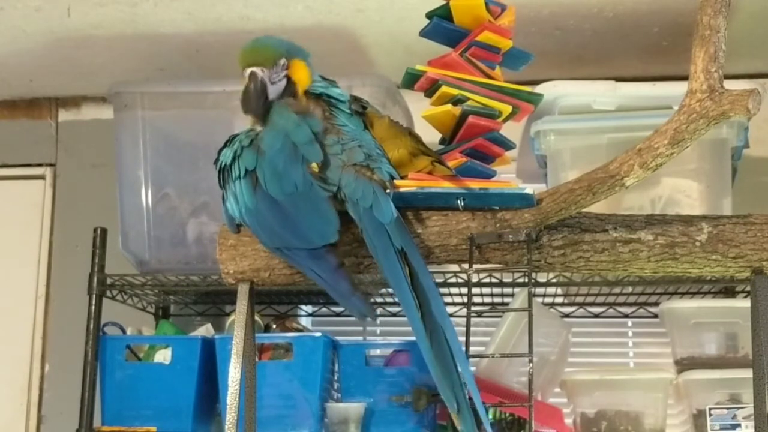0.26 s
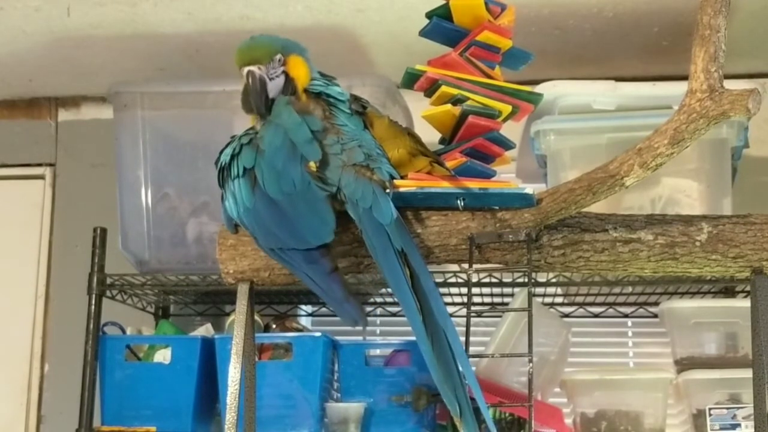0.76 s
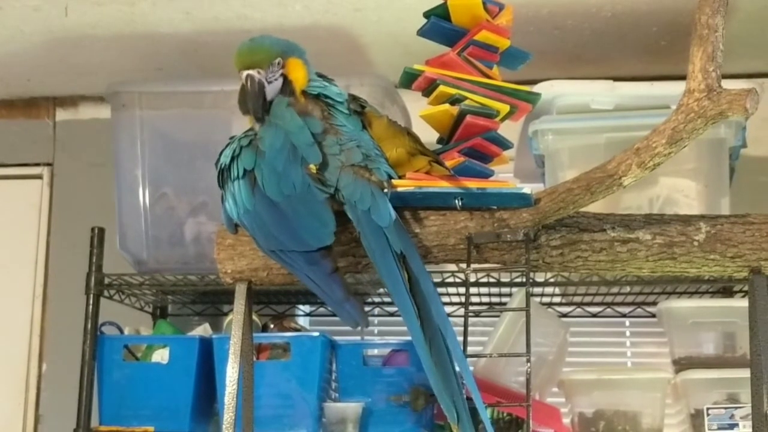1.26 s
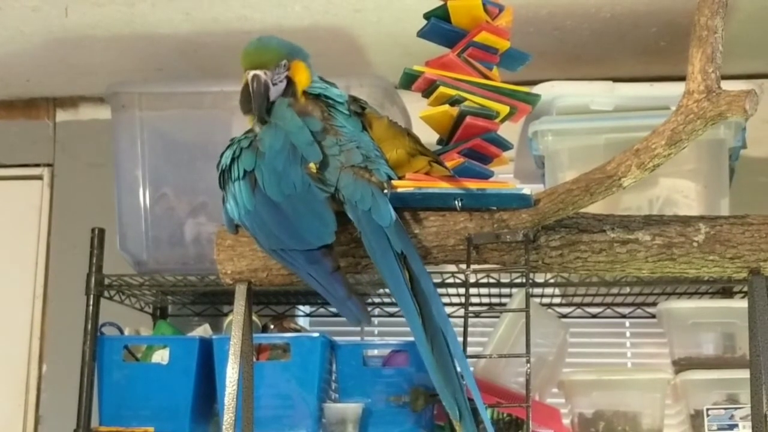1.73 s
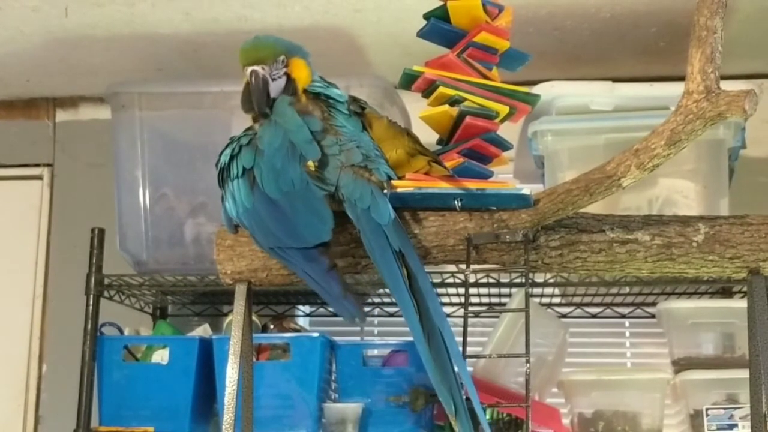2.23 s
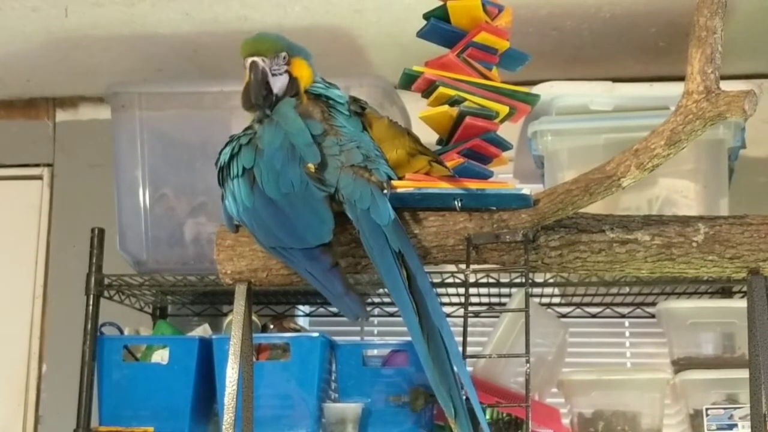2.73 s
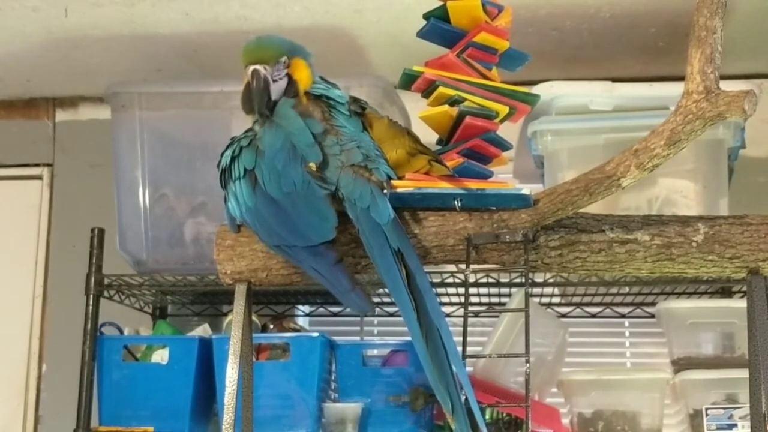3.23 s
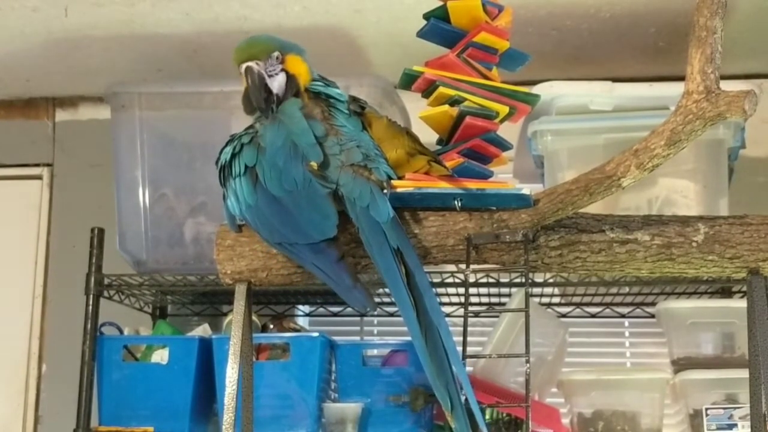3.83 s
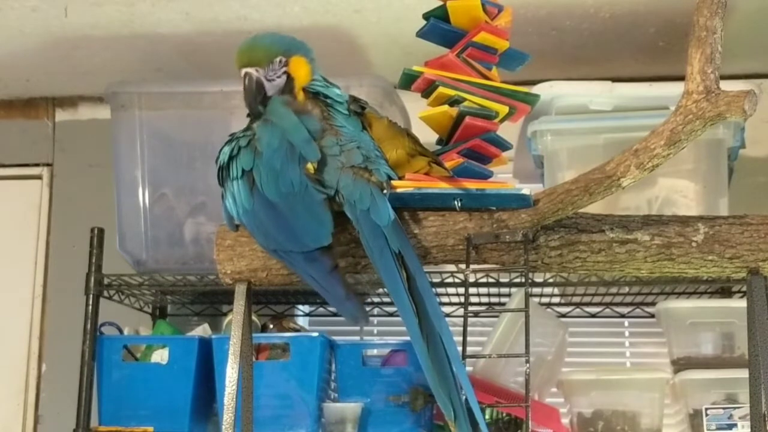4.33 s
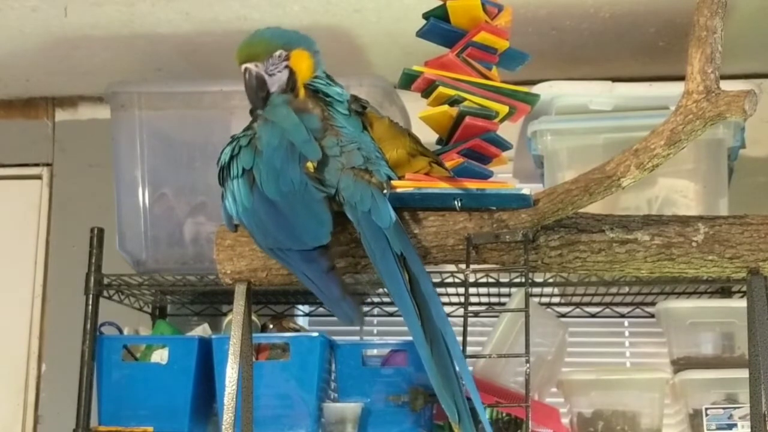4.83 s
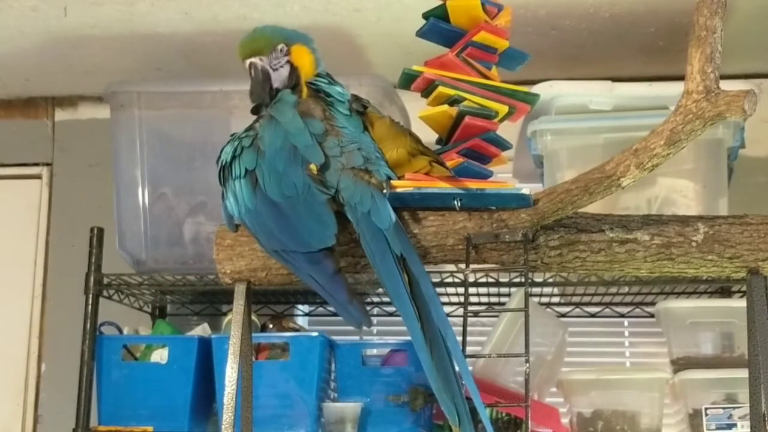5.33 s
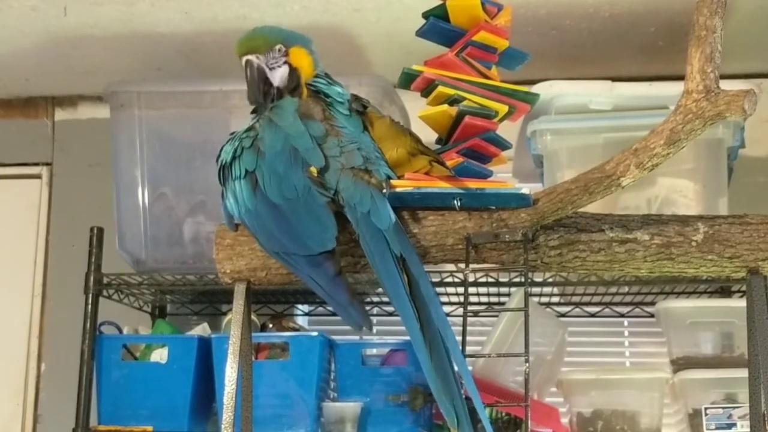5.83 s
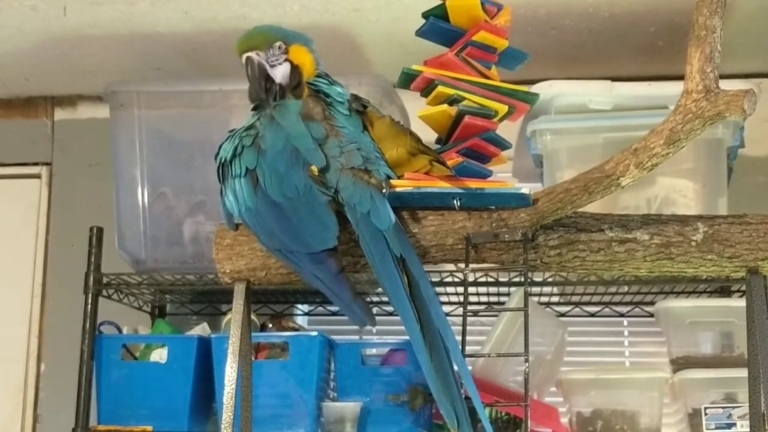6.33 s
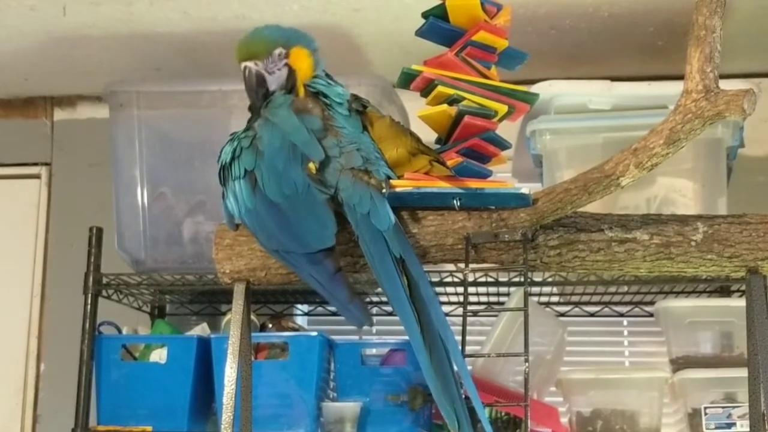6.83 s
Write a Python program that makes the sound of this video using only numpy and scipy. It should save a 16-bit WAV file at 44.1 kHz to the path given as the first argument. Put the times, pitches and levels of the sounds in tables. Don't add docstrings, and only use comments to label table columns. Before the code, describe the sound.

In a hard-walled bird room, raspy macaw squawks and two fast whistled twitters stand out above faint peeps, ticks, knocks and steady air hiss.

```python
import sys
import numpy as np
from scipy import signal
from scipy.fft import rfft, irfft, next_fast_len
from scipy.io import wavfile
from scipy.ndimage import uniform_filter1d, minimum_filter1d, map_coordinates

SR = 44100
rng = np.random.default_rng(int(sys.argv[2]) if len(sys.argv) > 2 else 0)


def nominal_scale(level):
    x = np.asarray(level, float) / 20
    return 10 ** x


def generate_wav(signal):
    frames = np.transpose(np.atleast_2d(signal))
    scaled = np.clip(frames, -1, 1) * 32767
    pcm = np.round(scaled).astype(np.int16)
    wavfile.write(sys.argv[1], SR, pcm)


N = 311787

# f/Hz, level/dB
HISS = [(15, -48), (25, -17), (116, -17), (183, -8.5), (246, -8.5), (306, -10), (422, -17.5), (538, -9),
        (850, -15), (1240, -15.5), (2490, -24.5), (3010, -21.5), (4760, -26), (6400, -23), (15600, -40)]
# f/Hz, level/dB
HISS_SHELF = [(5000, 0.5), (8100, 2), (8700, -9), (11000, 2), (15000, -3)]
# f/Hz, level/dB
HUM = [(59.2, -65.5), (177.6, -52), (209.9, -68.5), (290.7, -59.5), (538.3, -60.5), (672.9, -64.5)]
# f/Hz, level/dB
PATTER_COLOUR = [(1500, -32.5), (2800, -0.5), (5000, 0.0), (8000, -2.5), (12000, -19.0), (15600, -16.0)]

# t/s, peak level/dB, f/Hz
PEEPS = [(.207, -36.5, 4320), (1.552, -33, 6200), (1.729, -30, 3080), (1.931, -38, 5220),
         (2.159, -34, 3030), (2.217, -34, 6300), (2.302, -38, 2950), (2.381, -39.5, 2980),
         (2.908, -42.5, 3080), (2.931, -32, 8040), (3.14, -35.5, 6970), (3.326, -45, 2830),
         (3.411, -39.5, 6440), (3.466, -38.5, 5770), (3.652, -42, 6670), (3.743, -35.5, 6240),
         (3.808, -39, 3000), (4.156, -43, 6140), (4.778, -29.5, 5300), (4.855, -33.5, 3640),
         (5.024, -33, 2820), (5.174, -37.5, 5000), (5.452, -33.5, 7160), (5.612, -40, 3050),
         (5.75, -38.5, 7740), (5.9, -39.5, 5320), (5.962, -40, 3640), (6.291, -39, 6530),
         (6.32, -34.5, 4800), (6.611, -40.5, 5280)]
# t/s, peak level/dB, f/Hz
CHEEPS = [(3.929, -41, 2900), (4.822, -42, 3010), (5.562, -40, 3650), (5.64, -41, 3620), (5.66, -41, 3050),
          (5.775, -40, 3100), (5.825, -42, 3050), (5.92, -39, 3100), (6.065, -41, 3050), (6.295, -42, 3050),
          (6.42, -41, 3700), (6.468, -39, 5300), (6.51, -40, 3550), (6.645, -38, 3800)]
# t/s, peak level/dB, centre f/Hz
TICKS = [(.028, -39, 3340), (.056, -39, 6200), (.238, -38, 5900), (.314, -36.5, 6500), (.422, -40, 4930),
         (.619, -33, 4800), (1.476, -38, 3680), (1.526, -41, 4280), (1.652, -37.5, 5560),
         (1.788, -37.5, 5230), (1.868, -35, 4120), (1.998, -39, 5260), (2.327, -33, 6000),
         (2.403, -39, 4350), (2.992, -30, 5900), (3.025, -33, 6420), (3.191, -42, 4300), (3.574, -33, 7340),
         (4.717, -40.5, 3300), (4.956, -36, 3230), (5.088, -42, 3000), (5.259, -37.5, 5970),
         (5.492, -38, 5450), (5.515, -36.5, 3640), (5.543, -35.5, 3730), (6.109, -38, 6050),
         (6.211, -38.5, 6400), (6.338, -38, 7500), (6.487, -38, 5940), (6.536, -31, 6100)]
# t/s, peak level/dB, f/Hz
KNOCKS = [(1.651, -45.5, 1165), (1.996, -44.5, 1290), (2.402, -41, 1031), (3.192, -33, 1054),
          (3.807, -45.5, 1980), (4.445, -29.5, 1450), (4.638, -39.5, 1090), (5.087, -39, 1860),
          (5.14, -38, 1128), (5.361, -39.5, 1010), (5.641, -43, 1130), (6.108, -43, 1050),
          (6.213, -40, 1047)]
# t/s, peak level/dB, centre f/Hz
RUSTLES = [
    (0.241, -45, 4030),
    (2.991, -45.5, 3270),
    (3.04, -49.5, 1356),
    (4.95, -53, 2500),
    (5.258, -45.5, 2283),
    (5.264, -44, 5295),
]
# events, broad click level/dB, time to fall 60 dB t/s
FAR = [
    (CHEEPS, -14.5, 0.104),
    (PEEPS, -8.5, 0.12),
    (TICKS, 1.9, .11),
    (KNOCKS, -15, 0.31),
    (RUSTLES, 10, .7),
]

# t/s after start, from f/Hz, to f/Hz, hoarse share of pitch
TWITTER = [(0, 4300, 4600, 0), (.012, 3850, 4350, .04), (.018, 4900, 5300, .1), (.026, 6600, 6350, 0),
           (.058, 4900, 4800, .12), (.082, 4850, 4920, .015), (.095, 6050, 5900, .025),
           (.101, 4250, 4450, .02), (.117, 6520, 6350, 0), (.145, 5000, 5000, .11), (.158, 4700, 3950, .09),
           (.175, 3900, 3900, 0)]
CHIP = [
    (0, 6000, 5700, 0),
    (.007, 5430, 5380, 0),
    (.015, 5370, 5330, 0),
    (.021, 7100, 7250, .012),
    (.032, 4200, 4650, .06),
    (.043, 5500, 4300, .13),
    (.056, 3750, 3640, .02),
    (.068, 3640, 3640, 0),
]
TWITTER_DB = [-9, -12, -9, -11.5, -15, -11.5, -12, -10, -11.5, -11, -19, -47.5]
CHIP_DB = [-30, -15, -6, -14, -14, -15.5, -22, -45]
# start t/s, notes, note levels, level/dB, how far the first note swells/dB
SUNG = [
    (0.642, TWITTER, TWITTER_DB, 0.25, 10),
    (.874, CHIP, CHIP_DB, 0.3, 5.5),
    (4.204, TWITTER, TWITTER_DB, -0.8, 12),
    (4.439, CHIP, CHIP_DB, 0.9, -4),
]
# multiple of pitch, level/dB, extra level in the upper register/dB
OVERTONES = [(2, -9, -6.5), (3, -15.5, -4)]
# f/Hz, level/dB
BEAK = [(2500, 8.5), (3700, 1.5), (4400, -0.5), (6500, 5.5), (7600, 6.5), (9600, -2.5), (10750, -7),
        (11600, 2.5), (12700, 7.5), (13300, -3), (14300, -7.5), (15500, -7.5)]

# t/s, resting pitch f/Hz, level/dB
EFFORT = [
    [(1.080, 863, -43), (1.093, 960.6, -14.5), (1.112, 1124, -10.5), (1.16, 1135, -12),
     (1.244, 1169, -14.5), (1.262, 1166, -17), (1.335, 1144, -17.5), (1.358, 1085, -31.5),
     (1.38, 1120, -52)],
    [(2.490, 970, -32), (2.502, 967, -14), (2.518, 1115, -8), (2.57, 1118, -9), (2.63, 1138, -11),
     (2.71, 1142, -9), (2.742, 1161, -16.5), (2.775, 1242, -23.5), (2.81, 1131, -53)],
    [(6.657, 896, -35), (6.67, 924, -11), (6.69, 967.6, -7.5), (6.705, 1123, -7), (6.77, 1131, -6.5),
     (6.86, 1114, -14), (6.955, 1085, -11.5), (6.97, 1120, -28), (7.02, 1130, -40)],
]
# rasp starts to clear t/s, cry is clear t/s, flutter f/Hz,
# brightness of the clear cry/dB per octave, its fundamental level/dB
SQUAWKS = [
    (1.233, 1.253, 67.28, -2.5, -0.5),
    (2.601, 2.671, 79.03, -1, -8),
    (6.691, 6.871, 74.6, -0.2, -1),
]
# f/Hz, level/dB
THROAT = [(700, -13.5), (1150, -14.5), (1700, -14), (2300, -2), (3000, -8), (3500, -10.5), (4600, -9.5),
          (5800, -7.5), (7000, -15), (8200, -25), (10500, -34), (15500, -45.5)]

# t/s, level/dB
WALLS = [(.0035, -3), (.0085, -1), (0.0127, -8), (.019, -7), (.025, -13.5), (.031, -18.5)]
# f/Hz, time to fall 60 dB t/s
ROOM = [(1100, 0.21), (2300, 0.22), (5000, 0.21), (10000, 0.21), (15000, 0.022)]
# f/Hz, level/dB
MICROPHONE = [(20, -14), (45, -1), (70, 0), (15680, 0), (15800, -70)]


def unit(x):
    return x / np.sqrt(np.mean(x ** 2) + 1e-20)


def along(points, hz):
    f, v = np.transpose(points)
    return np.interp(np.log(np.maximum(hz, 1)), np.log(f), v)


def wobble(n, rate):
    return map_coordinates(rng.standard_normal(int(n * rate / SR) + 4), [np.arange(n) * rate / SR])


def sampled(rows):
    s, *cols = np.transpose(rows)
    t = np.arange(round(s[0] * SR), round(s[-1] * SR))
    return t[0], [np.interp(t / SR, s, c) for c in cols]


def add(out, start, x):
    out[start:start + len(x)] += x[:len(out) - start]


def coloured(x, points):
    m = next_fast_len(len(x) + 8192)
    gain = nominal_scale(along(points, np.fft.rfftfreq(m, 1 / SR)))
    return irfft(rfft(x, m) * gain, m)[:len(x)]


def background():
    z = signal.stft(rng.standard_normal(N + 512), nperseg=512)[2]
    patches = uniform_filter1d(uniform_filter1d(rng.standard_normal(z.shape), 12, 0), 8, 1)
    patchy = signal.istft(z * nominal_scale(1.3 * unit(patches)), nperseg=512)[1][:N]
    hiss = coloured(unit(coloured(patchy, HISS)), HISS_SHELF)
    t = np.arange(N) / SR
    hum = np.zeros(N)
    for hz, db in HUM:
        level = nominal_scale(db - 2.5 + 2.2 * wobble(N, 8.6))
        hum += level * np.sin(2 * np.pi * hz * t + 0.27 * wobble(N, 9.7))
    return nominal_scale(-52 + 0.12 * wobble(N, 36)) * hiss + hum


def patter():
    when, size, side = rng.random((260, 3)).T
    strength = nominal_scale(-6 * np.log(size + .14)) * np.sign(side - .5)
    clicks = np.bincount((when * N).astype(int), strength, N)
    puff = rng.standard_normal(1300) * nominal_scale(-60 * np.arange(1300) / SR / 0.055)
    return nominal_scale(-61.5) * unit(coloured(signal.fftconvolve(clicks, puff)[:N], PATTER_COLOUR))


def far_birds():
    out, t = np.zeros(N), np.arange(SR // 3) / SR
    hz = np.fft.rfftfreq(len(t), 1 / SR)
    for events, click_db, t60 in FAR:
        for s, db, pitch in events:
            narrow = 1 / (1 + ((hz - pitch) / (.05 * pitch)) ** 2)
            broad = 1 / (1 + ((hz - pitch) / (.45 * pitch)) ** 4)
            broad += .12 * (hz > pitch)
            peep = unit(irfft(rfft(rng.standard_normal(len(t))) * narrow, len(t)))
            click = unit(irfft(rfft(rng.standard_normal(len(t))) * broad, len(t)))
            fade = nominal_scale(-60 * t / max(t60, .02)) * (1 - np.exp(-t / 0.0011))
            add(out, round(s * SR), nominal_scale(db - 11.5) * fade * (peep + nominal_scale(click_db) * click))
    return out


def melody(shape, levels_db, swell_db):
    leap_s, dip_db = 0.0049, -6
    rows, notes = [], [note + (db,) for note, db in zip(shape, levels_db)]
    for (s, from_hz, to_hz, hoarse, db), (end, *_, next_db) in zip(notes, notes[1:]):
        rows.append((s, from_hz, hoarse, min(db, next_db + 2.5) + dip_db))
        rows.append((s + leap_s / 2, from_hz, hoarse, db))
        rows.append((end - leap_s / 2, to_hz, hoarse, db))
    first_hz, soft_db = rows[0][1], levels_db[0] - swell_db
    rows[:2] = [(0, first_hz, 0, soft_db - 30), (rows[2][0] / 3, first_hz, 0, soft_db)]
    rows[-1] = rows[-1][:3] + (levels_db[-1],)
    return rows


def whistles():
    lowest_hz = 3650
    full_db, overtones_grow = -13.5, 0.38
    out = np.zeros(N)
    for s, notes, levels_db, song_db, swell_db in SUNG:
        _, (pitch, hoarse, db) = sampled(melody(notes, levels_db, swell_db))
        pitch, db, n = uniform_filter1d(pitch, size=40), uniform_filter1d(db, size=70), len(pitch)
        top = np.clip((pitch - 6100) / 200, 0, 1)
        upper = np.clip((pitch - 5000) / 300, 0, 1)
        shake = (.004 + hoarse) * np.clip(wobble(n, 600), -1.7, 1.7)
        phase = 2 * np.pi * np.cumsum(np.maximum(lowest_hz, pitch * (1 + shake))) / SR
        tone = np.sin(phase)
        softness_db = overtones_grow * np.minimum(db - full_db, 0)
        for k, overtone_db, upper_db in OVERTONES:
            gain = nominal_scale(overtone_db + upper_db * upper + softness_db) * (k * pitch < 15700)
            tone += gain * np.sin(k * phase)
        tone += nominal_scale(-37 + 4 * np.sin(phase / 60)) * top * np.sin(.395 * phase)
        breath = nominal_scale(-31) * rng.standard_normal(n)
        level = nominal_scale(song_db + db + (3.0 + 25 * hoarse) * wobble(n, 300))
        add(out, round(s * SR), level * (np.sqrt(2) * tone + breath))
    return coloured(out, BEAK)


def squawks():
    rasp_depth, steady_depth, falter_depth = .08, .006, .025
    falter_db = -20
    rasp_tilt_db, opening_tilt_db, opening_s = 2, -15, 0.02815
    rasp_first_db, opening_first_db, falter_first_db = -5, -9, -9
    out, order = np.zeros(N), np.arange(1, 15)[:, None]
    for rows, (clearing_s, clear_s, rate, tilt_db, cry_db) in zip(EFFORT, SQUAWKS):
        start, (pitch, db) = sampled(rows)
        n = len(pitch)
        clear = np.interp(start + np.arange(n), [clearing_s * SR, clear_s * SR], [0, 1])
        raspy = 1 - clear
        closed = np.clip(1 - np.arange(n) / (opening_s * SR), 0, 1)
        falter = clear * np.clip((falter_db - db) / 5, 0, 1)
        depth = np.abs(raspy * rasp_depth + clear * steady_depth + falter * falter_depth)
        tilt = raspy * rasp_tilt_db + clear * tilt_db + closed * opening_tilt_db
        first_db = raspy * rasp_first_db + clear * cry_db
        first_db += falter * falter_first_db + closed * opening_first_db

        flutter = np.tanh(1.6 * np.sin(2 * np.pi * np.cumsum(rate * (1 + .2 * wobble(n, 50))) / SR))
        pitch = pitch * (1 + depth * (1 + flutter + .16 * wobble(n, 300)) + .002 * wobble(n, 60))
        phase = 2 * np.pi * np.cumsum(pitch) / SR
        gains = nominal_scale(along(THROAT, order * pitch) + tilt * np.log2(order / 2)) * (order * pitch < 15700)
        gains[0] *= nominal_scale(first_db + 75 * depth * (flutter - .5))
        tone = np.sum(gains * np.sin(order * phase + rng.uniform(0, 6.3, order.shape)), 0)
        tone /= np.sqrt(np.sum(gains ** 2, 0) / 2)
        air = rng.standard_normal(n) * (1 + np.cos(phase))
        puffs = unit(coloured(air, [(200, -40.5)] + THROAT))
        throb_db = depth * (8 * flutter + 19 * wobble(n, 250))
        rasp = .02 + 1.0 * depth
        add(out, start, nominal_scale(db + throb_db) * (np.sqrt(1 - rasp ** 2) * tone + rasp * puffs))
    return out


def room(x, tail_db):
    hz, t, z = signal.stft(rng.standard_normal(SR // 2), SR, nperseg=256)
    echo = signal.istft(z * nominal_scale(-60 * t / along(ROOM, hz)[:, None]), SR, nperseg=256)[1]
    echo *= np.clip(np.arange(len(echo)) / (0.0042 * SR), 0, 1)
    echo *= nominal_scale(tail_db) / np.linalg.norm(echo)
    echo[0] = 1
    for s, db in WALLS:
        scatter = rng.standard_normal(90) * np.exp(-np.arange(90) / 14)
        add(echo, round(s * SR), nominal_scale(db) * scatter / np.linalg.norm(scatter))
    return signal.fftconvolve(x, echo / np.linalg.norm(echo))[:N]


def scene():
    calls = room(squawks(), tail_db=0.0) + room(whistles(), tail_db=-3.0)
    loudness = np.sqrt(np.abs(uniform_filter1d(calls ** 2, size=3000)))
    ducked = (1 + loudness / 0.049) ** -.3
    return np.tile(calls + ducked * (background() + far_birds() + patter()), (2, 1))


def roll_off(x):
    return signal.sosfilt(signal.butter(12, 15700, fs=SR, output="sos"), x)


def record(dry):
    mono = coloured(dry[0], MICROPHONE)
    needed = np.minimum(1, 1.0 / (np.abs(mono) + 1e-9))
    gain = uniform_filter1d(minimum_filter1d(needed, size=44), size=36)
    return roll_off(np.tile(mono * gain, (2, 1)))


dry = scene()
out = record(dry)
generate_wav(out)
```